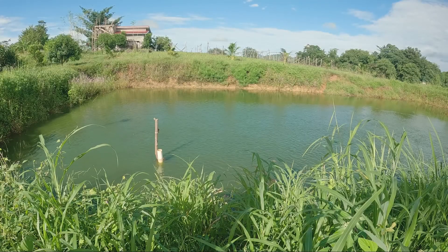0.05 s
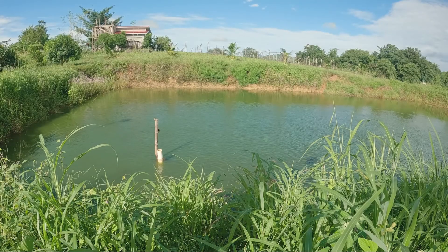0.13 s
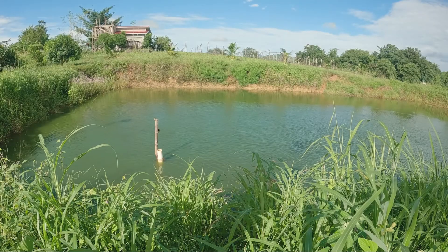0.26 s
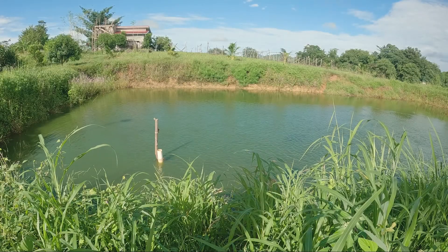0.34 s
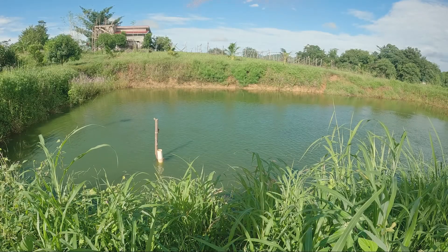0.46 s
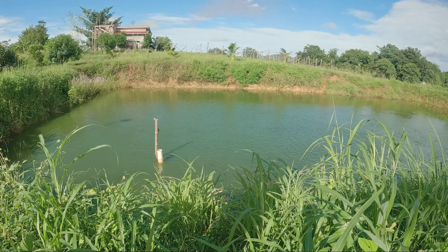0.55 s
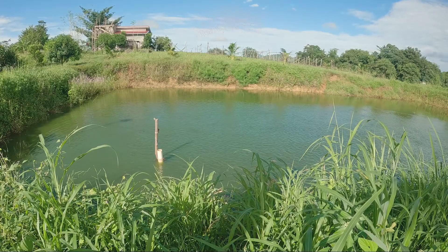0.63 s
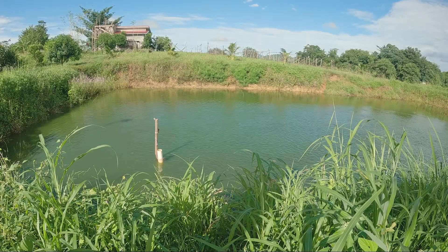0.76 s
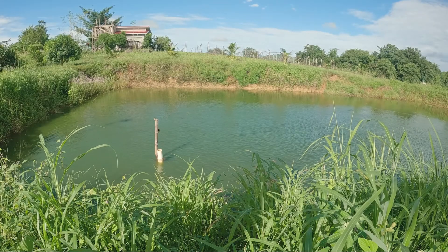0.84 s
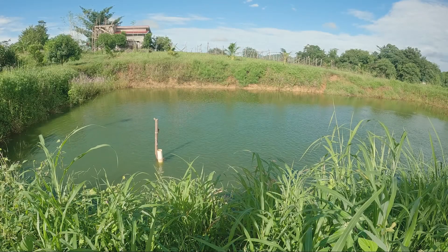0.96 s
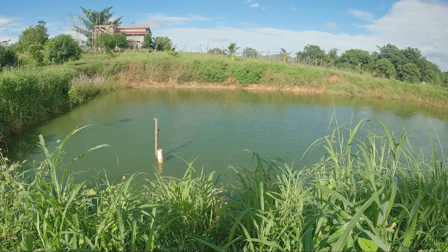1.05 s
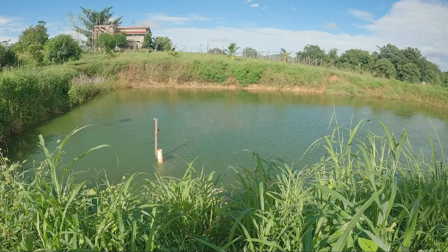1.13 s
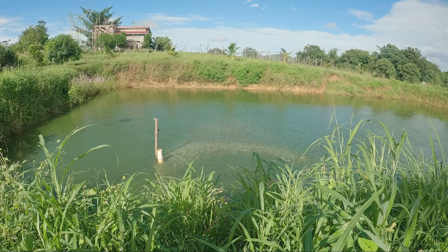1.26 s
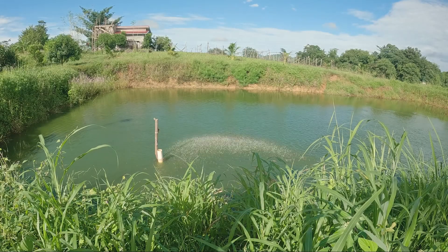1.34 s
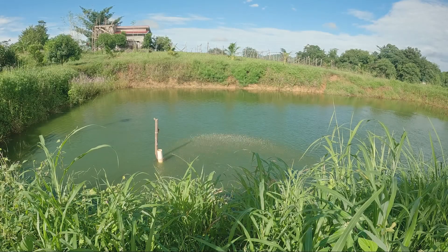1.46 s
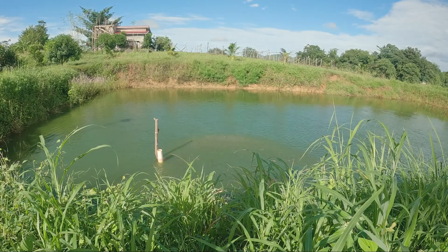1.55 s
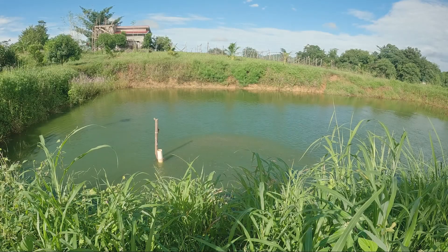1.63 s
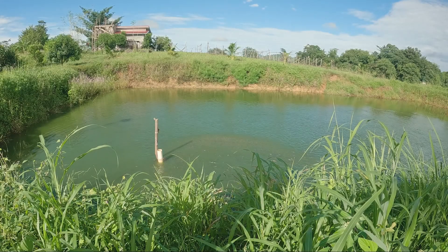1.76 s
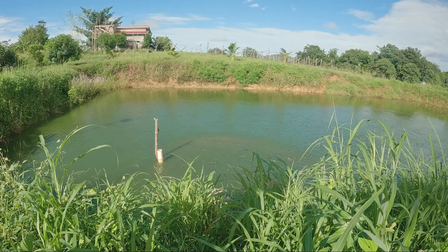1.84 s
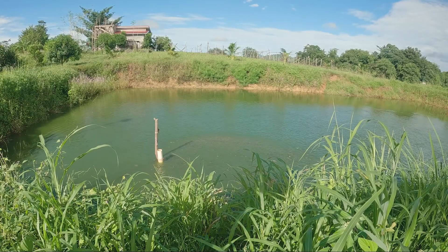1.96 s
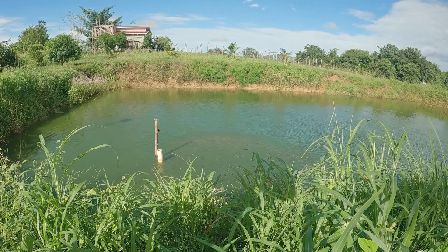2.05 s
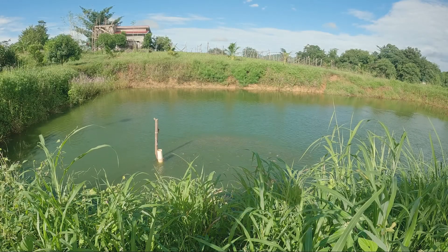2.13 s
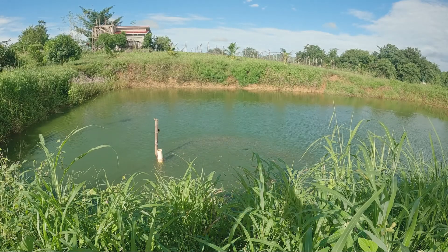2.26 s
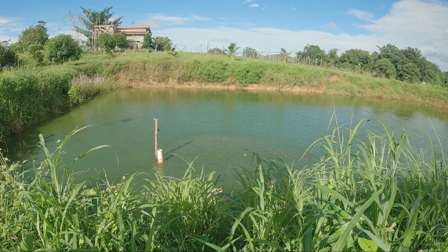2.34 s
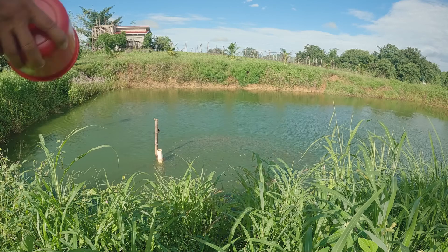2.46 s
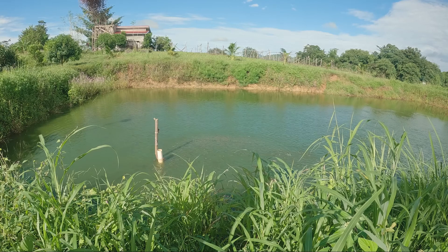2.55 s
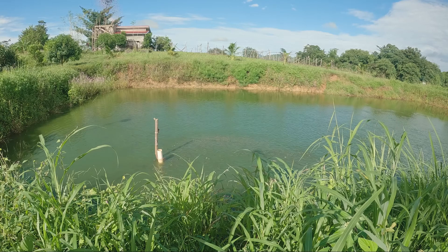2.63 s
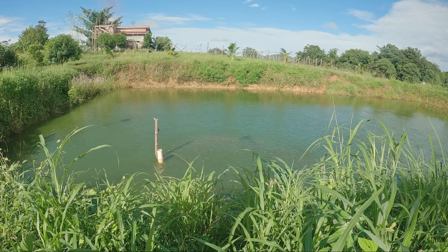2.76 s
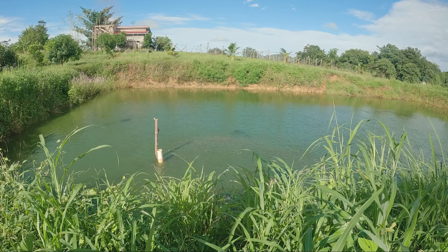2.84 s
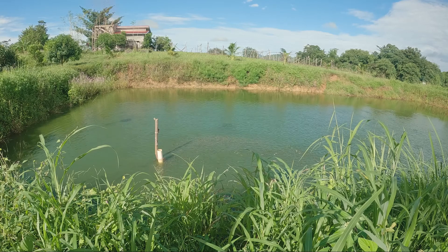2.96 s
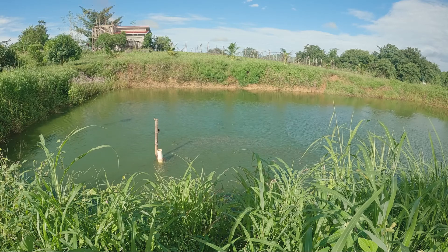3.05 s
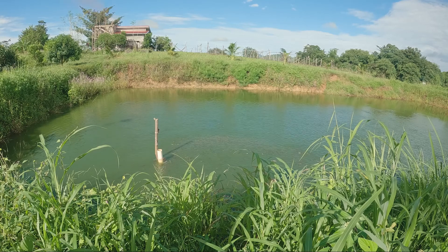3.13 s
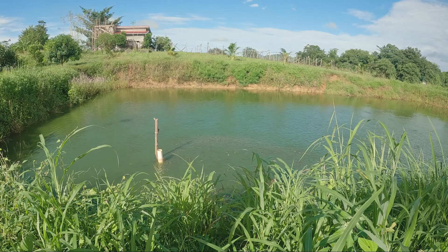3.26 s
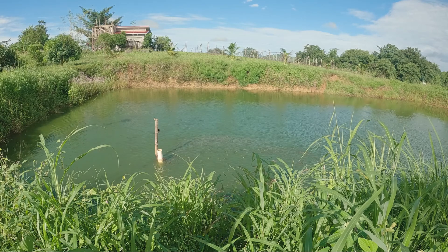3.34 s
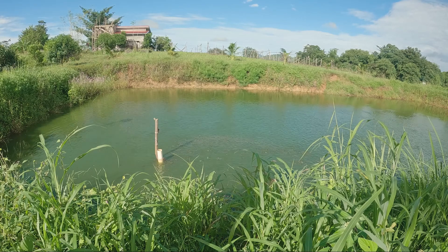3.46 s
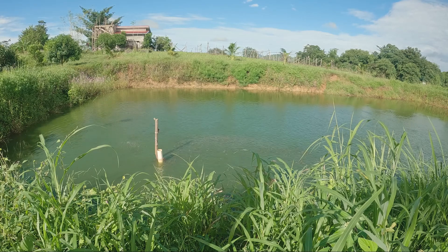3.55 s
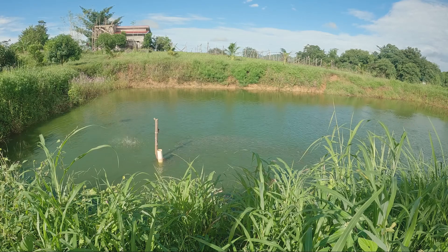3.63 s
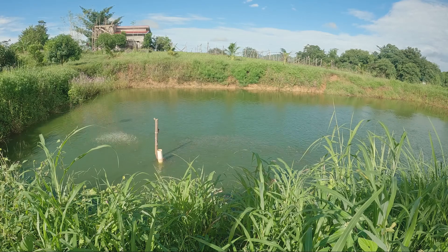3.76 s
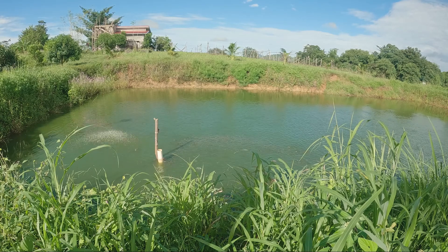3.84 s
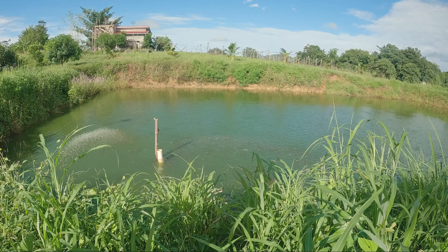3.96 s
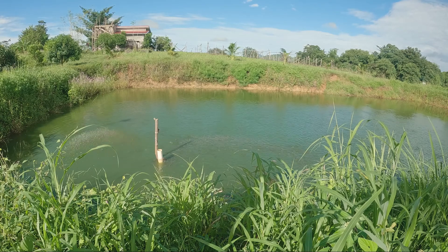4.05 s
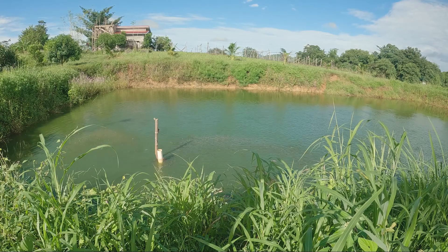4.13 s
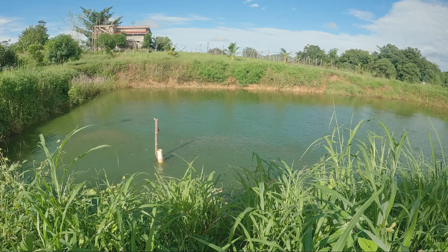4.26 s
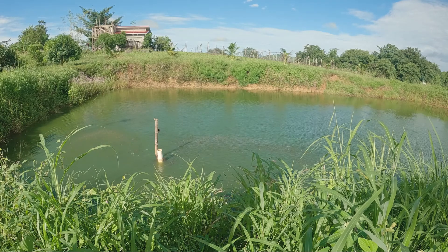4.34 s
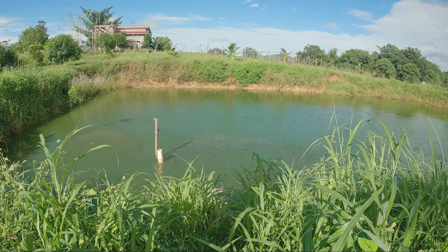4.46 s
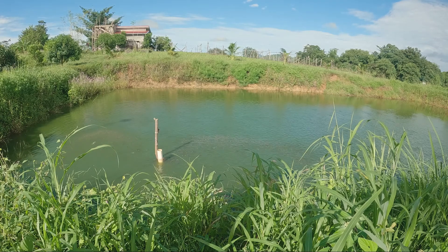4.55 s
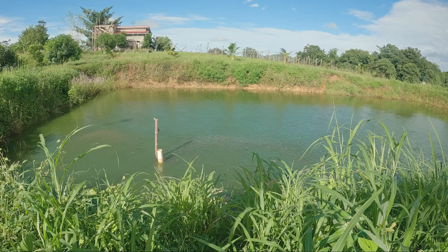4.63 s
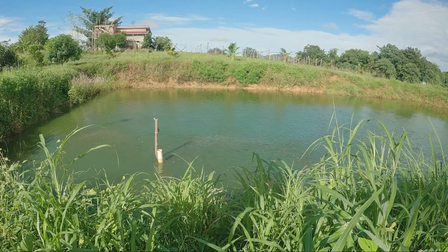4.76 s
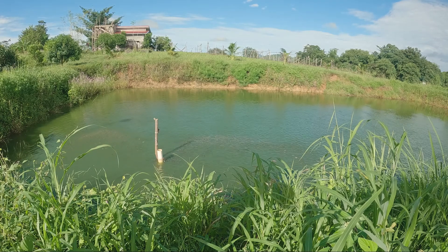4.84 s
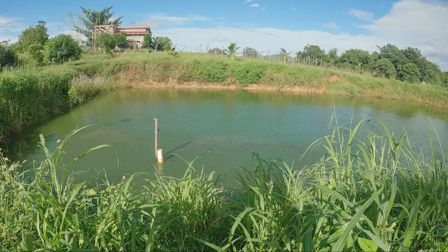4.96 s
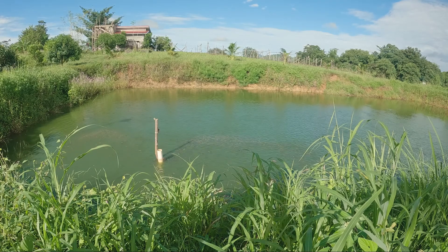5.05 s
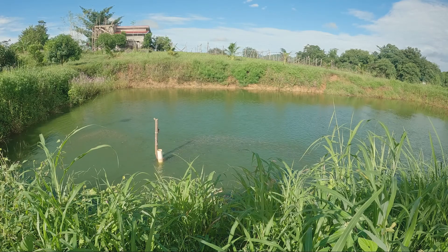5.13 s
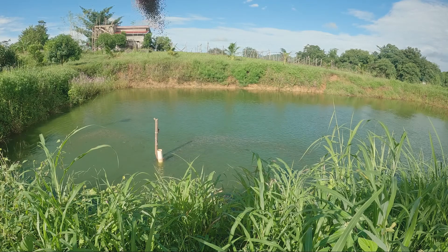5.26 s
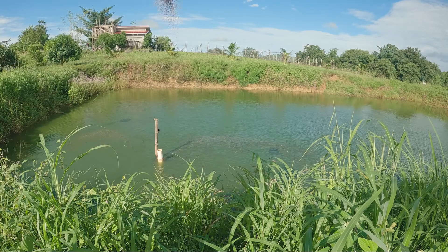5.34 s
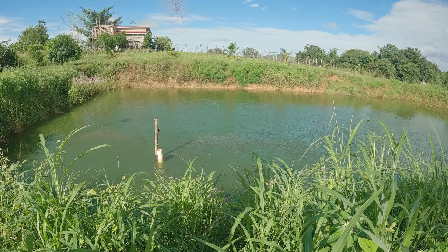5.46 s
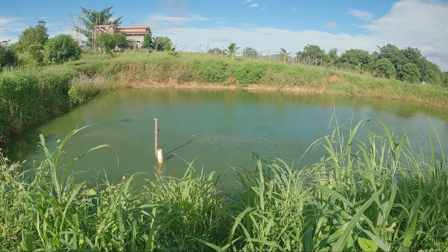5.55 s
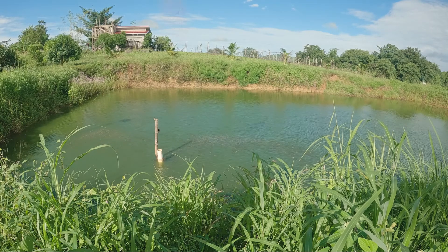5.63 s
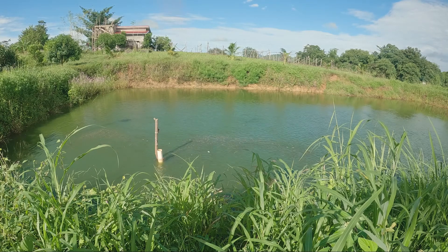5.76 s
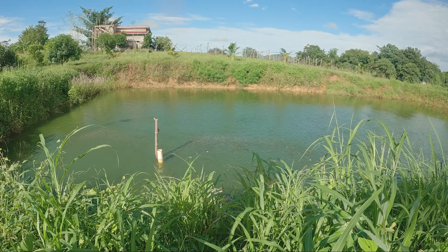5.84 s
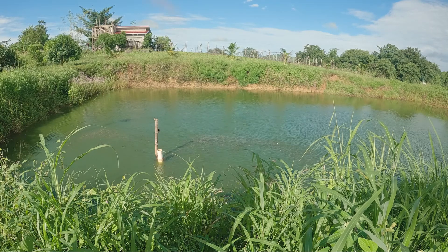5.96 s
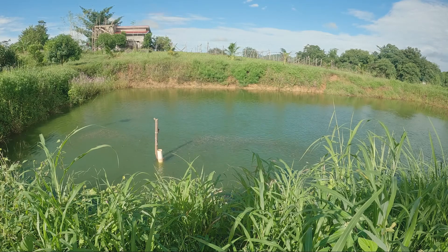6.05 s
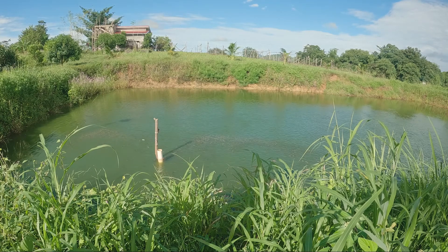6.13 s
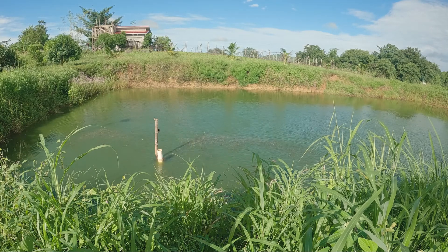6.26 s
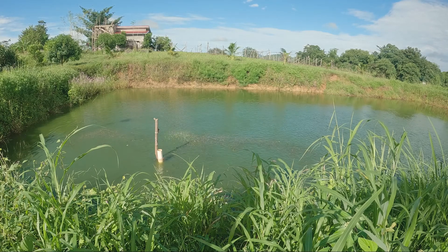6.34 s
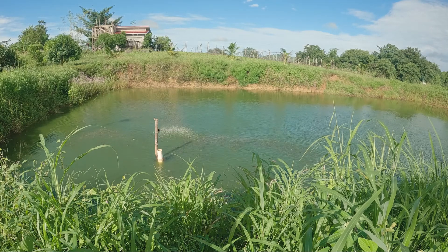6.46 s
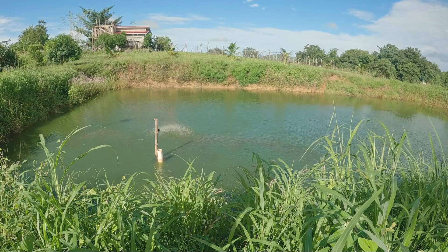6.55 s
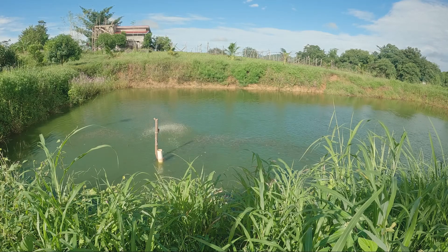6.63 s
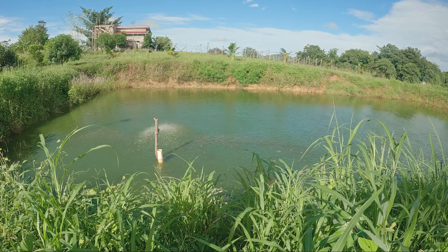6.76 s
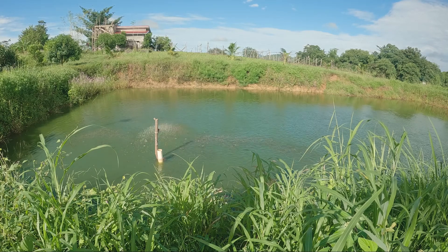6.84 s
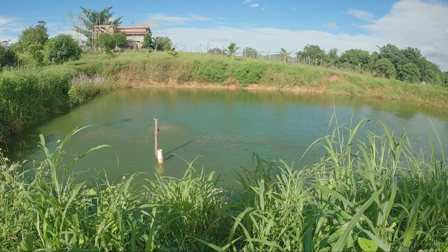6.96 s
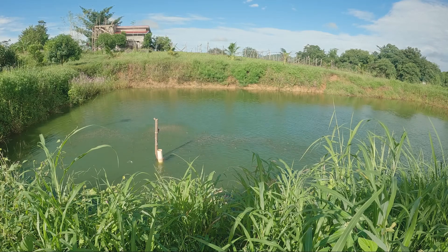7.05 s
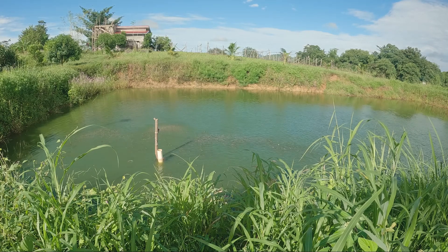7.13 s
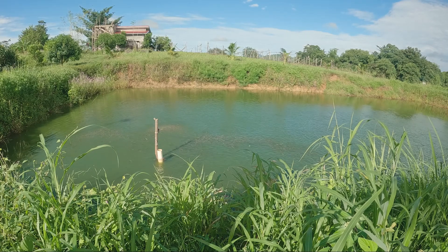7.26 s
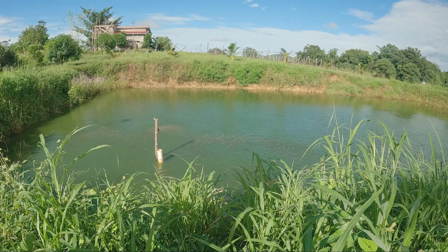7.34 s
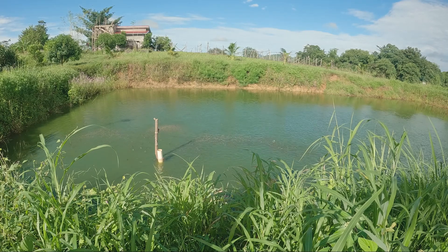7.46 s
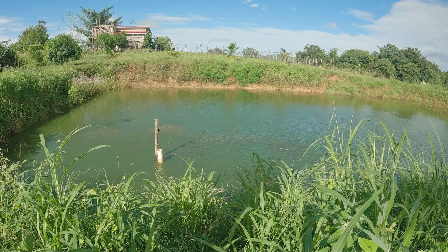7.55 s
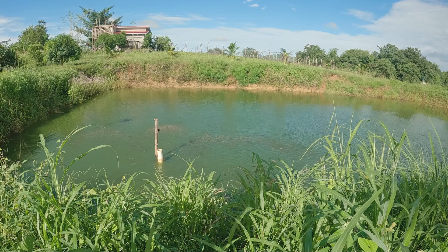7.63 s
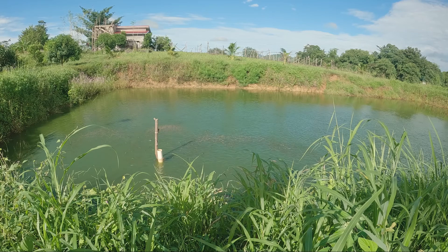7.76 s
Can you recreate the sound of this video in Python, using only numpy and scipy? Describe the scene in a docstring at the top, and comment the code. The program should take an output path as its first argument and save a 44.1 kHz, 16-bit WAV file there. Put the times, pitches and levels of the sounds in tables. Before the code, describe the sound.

Outdoors at a pond, faint crickets chirp throughout over a low, distant rumble and a soft wash of water. A brief shower of pellets splashes at the very start. At about 0.7 seconds a scoop knocks hollowly in a plastic bucket, close on the left, and digs through feed pellets; a light patter on the water follows at 1.4 seconds. At 2.5 seconds pellets are flung past the microphone with a loud, short hiss. The scoop knocks and digs again from 3.2 to 3.7 seconds, and the thrown feed sprinkles the pond around 4 seconds. Pellets rattle softly in the scoop before a second sharp swish at 5.2 seconds. More knocks and scraping come from 6 to 6.7 seconds, overlapping another soft shower on the water. Light rattling and stray ticks continue until nearly 8 seconds. Small plops, drips and bubbles are scattered between the throws.

```python
"""Feeding fish at a pond

A scoop knocks and digs in a plastic bucket just left of the camera's two microphones. Flung past
them, feed pellets rattle and hiss off the scoop's rim, then splash on the water in a shower.
Fish leave drips and bubbles; crickets sing in the grass over a far rumble."""
import sys
import numpy as np
from scipy import signal
from scipy.fft import rfft, irfft, next_fast_len
from scipy.io import wavfile
from scipy.ndimage import uniform_filter1d, map_coordinates

SR = 44100
rng = np.random.default_rng(int(sys.argv[2]) if len(sys.argv) > 2 else 0)


def store_wav(level_fs):
    """Save 16-bit WAV to argv[1]."""
    pcm = np.round(np.clip(np.atleast_2d(level_fs), -1, 1) * 32767)
    wavfile.write(sys.argv[1], SR, pcm.T.astype(np.int16))


N = 343980


def amp(db):
    return 10 ** (np.asarray(db) / 20)


def unit(x):
    return x / np.sqrt(np.mean(x ** 2) + 1e-20)


def along(points, hz):
    """Read (hz, value) points on a log frequency axis."""
    f, v = np.transpose(points)
    return np.interp(np.log(hz + 1), np.log(f + 1), v)


def curves(rows):
    """One value per sample for each column after the time."""
    s, *cols = np.transpose(rows)
    return [np.interp(np.arange(N) / SR, s, c) for c in cols]


def wobble(rate):
    """A smooth random curve, rate knots a second."""
    return map_coordinates(rng.standard_normal(int(N * rate / SR) + 4), [np.arange(N) * rate / SR])


def filtered(x, response):
    """x times a response of frequency."""
    m = next_fast_len(N + SR // 4)
    return irfft(rfft(x, m) * response(np.fft.rfftfreq(m, 1 / SR)), m)[..., :N]


def coloured(x, spectrum):
    return unit(filtered(x, lambda hz: amp(along(spectrum, hz))))


def resonance(hz, centre_hz, width_hz):
    return 1j * hz * width_hz / (centre_hz ** 2 - hz ** 2 + 1j * hz * width_hz)


def sizes_db(chance, spread_db):
    """Many small, few large; the largest are bounded."""
    return np.minimum(-np.log(1 - chance), 3) * spread_db


def patter(count, spread_db, smooth):
    """Tiny contacts of uneven size over a share of smooth noise."""
    when, size, sign = rng.random((count, 3)).T
    hits = np.bincount((when * N).astype(int), np.sign(sign - .5) * amp(sizes_db(size, spread_db)), N)
    return np.sqrt(1 - smooth) * unit(hits) + np.sqrt(smooth) * rng.standard_normal(N)


def blips(s, db, hz, life_s, glide=0, samples=512):
    """Damped sines whose pitch climbs by the share glide during their life."""
    s, db, hz, life_s, glide = (np.reshape(v, (-1, 1)) for v in (s, db, hz, life_s, glide))
    t = np.arange(samples) / SR
    age = t / np.clip(life_s, .0002, .08)
    phase = 2 * np.pi * hz * t * (1 + glide * np.minimum(age, 2) / 2)
    wave = amp(db) * np.sin(phase) * (1 - np.exp(-14 * age)) * np.exp(-.8 * age - age ** 3)
    at = (s * SR).astype(int) + np.arange(samples)
    return np.bincount(at.ravel(), wave.ravel(), N + samples)[:N]


def swells(s, rise, fall, db, hold=0, edge_db=10.5, roundness=1.63):
    """Gain of overlapping swells, each edge_db down one rise or fall time from its top."""
    s, rise, fall, db, hold = (np.reshape(v, (-1, 1)) for v in (s, rise, fall, db, hold))
    t = np.arange(0, N, 64) / SR
    from_top = np.maximum((s - t) / rise, (t - s - hold) / fall).clip(0)
    power = amp(db - edge_db * from_top ** roundness) ** 2
    return np.interp(np.arange(N) / SR, t, np.sqrt(power.sum(axis=0)))


def placed(x, balance, alike):
    """Two microphones: a level difference, and scattered sound that differs between them."""
    t = np.arange(SR // 70) / SR
    scatter = rng.standard_normal(len(t)) * amp(-60 * t / 0.0041)
    scattered = signal.fftconvolve(x, scatter / np.linalg.norm(scatter))[:N]
    angle = lambda hz: np.arccos(along(alike, hz)) / 2
    mid = filtered(x, lambda hz: np.cos(angle(hz)))
    side = filtered(scattered, lambda hz: np.sin(angle(hz)))
    pair = np.array([mid + side, mid - side])
    return filtered(pair, lambda hz: amp(np.outer([.4, -.6], along(balance, hz))))


# Far rumble, spectrum: freq_hz, gain_db
RUMBLE_SPECTRUM = [(11, -38), (18, -10), (70, 5.5), (97, -4.5), (124, -4.5), (173, -15), (203, -10.5),
                   (226, -19), (450, -27.5), (700, -50), (990, -90)]
# Level of the rumble, with a brief dip after the second throw: time_s, level_db
RUMBLE_LEVELS = [(0, -41.5), (2.3, -44), (4.9, -46), (5.3, -42.5), (5.5, -49), (6.6, -44), (7.8, -42)]
def far_rumble():
    """Low wavering noise from a distance, nearly alike at both microphones."""
    level_db, = curves(RUMBLE_LEVELS)
    rumble = coloured(rng.standard_normal(N), RUMBLE_SPECTRUM) * amp(level_db + 1.8 * wobble(5))
    return placed(rumble, balance=[(60, -0.26), (400, -0.83)], alike=[(60, 1), (300, 0.87)])


# Countless insects far off in the grass: freq_hz, gain_db
MEADOW_SPECTRUM = [(5000, -29), (6500, -4), (8500, 2), (10300, -4), (11300, -20), (14000, -19),
                   (15700, -40)]
# Far singers, to the left: time_s, chorus_db, trill_db, buzz_db
FAR_INSECTS = [(0, -54, -70, -71), (.6, -56.5, -77, -83), (1.5, -55, -72, -69), (3.1, -56.5, -70, -78),
               (3.9, -53.5, -62.5, -67), (4.7, -55, -66, -68), (5.8, -57, -68, -74), (6.5, -54, -70, -66.5),
               (7.8, -54, -68, -67)]
# Pace of the trill: time_s, bursts_per_s
TRILL_PACE = [(0, 9.5), (3, 9.6), (3.6, 10.3), (5.5, 9.65), (6, 9.0), (7.8, 9.0)]
def far_insects():
    """A shimmering chorus, a trill in bursts and an unbroken buzz over the meadow's hiss."""
    chorus_db, trill_db, buzz_db = curves(FAR_INSECTS)
    t, noise = np.arange(N) / SR, rng.standard_normal

    def band(x, hz, width_hz):
        return unit(filtered(x, lambda f: resonance(f, hz, width_hz) ** 2))

    def strokes(per_s):
        pulses = np.diff(np.floor(per_s * t + .25 * wobble(6)), prepend=0)
        return unit(pulses * amp(0.57 * wobble(60))) + .5 * noise(N)

    chorus = band(noise((2, N)) + 0.63 * noise(N), 7530, 580) * amp(chorus_db + 2 * wobble(50))
    bursts = (np.cumsum(curves(TRILL_PACE)[0]) / SR - .04) % 1 < .68
    trill = amp(trill_db) * band(strokes(121) * uniform_filter1d(1. * bursts, size=500), 8760, 550)
    buzz = amp(buzz_db) * band(strokes(105), 10070, 450)
    meadow = amp(-65) * coloured(noise((2, N)) + 1.2 * noise(N), MEADOW_SPECTRUM)
    return meadow + chorus * amp([[2], [-2.5]]) + (trill + buzz) * amp([[1.5], [-2]])


# One cricket nearby on the left, loudest note of each phrase: time_s
PHRASE_TIMES = [0.2174, 0.459, 0.688, 0.9892, 1.2695, 1.5589, 1.828, 2.09, 2.331, 2.8604, 3.116, 3.3717,
                3.6379, 3.9215, 4.1619, 4.4104, 4.685, 4.9606, 5.2026, 5.5717, 5.8267, 6.0546, 6.337,
                6.5734, 6.8294, 7.21, 7.514, 7.7754]
# The notes of a phrase: offset_s, gain_db, pitch_hz
PHRASE_NOTES = [(-.055, -1, 7200), (-.041, 2, 7080), (-.0145, 1, 6950), (0, 6.5, 7220), (.093, 0, 7100)]
def near_cricket():
    """A phrase of five short high notes, repeated a little louder or softer."""
    s = np.array(PHRASE_TIMES)
    db = rng.normal(-46.5, 1, len(s))
    song = sum(blips(s + offset, db + gain_db, hz, life_s=0.0055) for offset, gain_db, hz in PHRASE_NOTES)
    return song * amp([[2], [-2.5]])


# Level of the water's wash and crackle; it jumps at 0.7 s and dips after the second throw:
# time_s, wash_db, crackle_db
WATER_LEVELS = [(0, -57.5, -84), (.68, -71, -84), (.71, -51, -68), (1.4, -58, -57), (2.6, -50, -57),
                (3.3, -55, -66), (4.6, -56, -56), (5.3, -50, -59), (5.42, -56, -67), (6.2, -51.5, -62),
                (7.0, -50, -61), (7.8, -55, -62)]
# Wash of the water: freq_hz, gain_db
WASH_SPECTRUM = [(180, -16), (300, -4), (450, -6), (800, -7.5), (1100, -1.5), (2000, -5.5), (3200, -9),
                 (6000, -11.5), (8300, -20), (11500, -21.5), (14000, -27), (15500, -60)]
# Bubbles that close as they rise: start_s, level_db, first_hz, last_hz, life_s
RISING_BUBBLES = [(.36, -56, 990, 1400, .012), (4.955, -52, 770, 1090, .028), (.425, -57, 520, 950, 0.035),
                  (2.286, -44, 790, 1090, 0.049), (2.645, -47, 784, 1200, 0.026),
                  (2.691, -45, 1040, 1430, 0.035), (2.74, -50, 1300, 2330, .018),
                  (3.025, -48, 1030, 1510, 0.021), (3.165, -47, 1200, 1600, 0.021),
                  (3.208, -48, 1090, 3020, .02), (5.11, -47, 590, 1310, 0.072),
                  (5.35, -50, 970, 1860, 0.033), (5.566, -46.5, 843, 1320, 0.05),
                  (5.87, -48, 496, 830, 0.039), (6.155, -48, 646, 1090, 0.022),
                  (6.89, -40.5, 435, 1140, .07), (7.556, -39, 1059, 1610, 0.016),
                  (7.725, -55, 880, 1240, 0.033)]
def pond():
    """Rising bubbles, faint random plops and a crackle of bursting film on a wash."""
    wash_db, crackle_db = curves(WATER_LEVELS)
    s, db, first_hz, last_hz, life_s = np.transpose(RISING_BUBBLES)
    rising = blips(s, db, first_hz, life_s, glide=last_hz / first_hz - 1, samples=4500)
    when, pitch, size, ring = rng.random((1600, 4)).T
    s, hz = when * (N - 1) / SR, 850 * amp(9 * pitch)
    plops = blips(s, sizes_db(size, 2.6), hz, (4 + 14 * ring ** 2) / hz, 0.28 * ring ** 2, samples=1024)
    when, pitch, size, ring = rng.random((900, 4)).T
    s, hz = when * (N - 1) / SR, 1800 * amp(11 * pitch)
    crackle = blips(s, sizes_db(size, 1.8), hz, (2 + 3 * ring) / hz, samples=128)
    wash = coloured(rng.standard_normal(N), WASH_SPECTRUM) * amp(0.96 * wobble(13))
    return amp(wash_db) * (0.64 * wash + 0.54 * unit(plops)) + amp(crackle_db) * unit(crackle) + rising


# Drops and fish mouths on the water, centre: start_s, level_db, pitch_hz
WATER_PLOPS = [(0.494, -42.5, 1610), (0.515, -49, 730), (1.278, -28.5, 2200), (1.973, -43, 1360),
               (2.023, -40.5, 2240), (2.12, -40, 1690), (2.339, -42, 690), (2.719, -44, 745),
               (2.745, -34, 1900), (2.91, -46, 1320), (2.922, -39.5, 2340), (2.941, -41, 1470),
               (3.057, -46, 1460), (3.184, -40.5, 1400), (4.653, -33, 1860), (4.682, -35.5, 1940),
               (4.721, -35.5, 1640), (4.738, -33, 2660), (4.761, -33, 1880), (5.092, -42, 1240),
               (5.134, -39, 1860), (5.404, -43, 1720), (5.609, -42.5, 1080), (5.84, -39, 2520),
               (5.854, -36, 1540), (7.115, -40, 1210), (7.25, -33.5, 2140), (7.475, -38.5, 1340),
               (7.521, -35, 1050)]
# Stray pellets and drops, either side: start_s, level_db, pitch_hz, left_over_right_db
STRAY_TICKS = [(0.5172, -33, 4600, -1.5), (1.805, -32, 4110, 7.5), (1.8453, -34.5, 2610, 5),
               (2.0972, -24, 4100, -1), (2.1387, -26.5, 3430, 2), (2.9598, -33.5, 3500, -1.0),
               (4.605, -29.5, 3400, 0), (4.9856, -23.5, 4100, 1.0), (5.008, -20, 6060, 2),
               (5.7309, -38, 4790, 0.0), (5.7549, -34, 2700, -3), (6.033, -37, 4710, 2.5),
               (6.8663, -22, 3120, 4), (7.0577, -21.5, 4900, -1), (7.213, -26.5, 4210, 4.5),
               (7.3484, -29, 4710, 5), (7.5597, -31, 5190, 4.5), (7.645, -40, 4450, 3.5),
               (7.6825, -35, 4400, 4), (7.79, -42, 4400, 19)]
# Pellets snapping on plastic, to the left: start_s, level_db, left_over_right_db
PLASTIC_SNAPS = [(1.165, -40, 6.0), (2.3955, -44, 17), (2.4229, -39, 20), (2.459, -36, 18), (2.82, -44, 1),
                 (4.2607, -38, 11), (4.3, -38, 12), (4.378, -39, 9.5), (5.1552, -42, 18),
                 (6.7625, -37, 4.5), (7.1375, -32, 7.0), (7.4535, -46, 24), (7.4955, -41, 15.5),
                 (7.5802, -44, 2.5)]
def drips_and_strays():
    """Single plops, ticks and bright snaps; the pond's banks smear them a little."""
    def panned(s, db, pan_db, hz, life_s):
        return np.array([blips(s, db + side * pan_db / 2, hz, life_s, samples=128) for side in (1, -1)])

    s, db, hz = np.transpose(WATER_PLOPS)
    plops = blips(s, db, hz, 7 / hz, glide=0.034, samples=1024)
    s, db, hz, pan_db = np.transpose(STRAY_TICKS)
    ticks = panned(s, db, pan_db, hz, 2 / hz)
    s, db, pan_db = np.transpose(PLASTIC_SNAPS)
    snaps = panned(s, db, pan_db, hz=11500, life_s=0.00042)
    dull_plastic = panned(s, db + 3.5, pan_db, hz=3050, life_s=2 / 3050)
    direct = plops + ticks + snaps + dull_plastic
    t = np.arange(SR // 50) / SR
    banks = rng.standard_normal((2, len(t))) * amp(-60 * t / 0.056)
    banks /= np.linalg.norm(banks[0])
    return direct + amp(0.5) * signal.fftconvolve(direct, banks, axes=1)[:, :N]


# Pellets landing out on the pond: top_s, rise_s, hold_s, fall_s, level_db, tilt_db, drift_db_per_s
LANDINGS = [(0.107, 0.044, 0.067, 0.018, -29, 2, 46), (1.386, 0.12, 0.048, 0.088, -34, 0, -18),
            (4.005, 0.25, 0.043, 0.039, -36.5, 0, 1), (6.595, 0.22, 0.29, 0.047, -39, -2, 6)]
# Their spray: freq_hz, gain_db
SPRAY_SPECTRUM = [(180, -30), (300, -14.5), (550, -6), (950, -0.5), (1600, -2), (3500, -3.5), (5500, -6),
                  (8000, -18), (10500, -19.5), (12500, -20), (14000, -32), (15600, -42)]
def showers():
    """Hundreds of pellets break the surface: short bubbles inside a spray of clicks."""
    s, rise, hold, fall, db, tilt_db, drift = np.transpose(LANDINGS)
    t = np.arange(N) / SR
    nearest = np.argmin(np.abs(t - s[:, None]), axis=0)
    bright_db = np.clip(tilt_db[nearest] + drift[nearest] * (t - s[nearest]), -9, 9)
    when, pitch, size = rng.random((10000, 3)).T
    hz = 700 * amp(17 * pitch)
    fizz = unit(blips(when * (N - 1) / SR, sizes_db(size, 12), hz, 3 / hz, glide=0.17, samples=256))
    spray = coloured(patter(count=40000, spread_db=2, smooth=0.2), SPRAY_SPECTRUM) + 0.29 * fizz
    low = filtered(spray, lambda hz: 1 / (1 + (hz / 2500) ** 2))
    return swells(s, rise, fall, db, hold) * (amp(-bright_db) * low + amp(bright_db) * (spray - low))


# Digging deep in the bucket: top_s, rise_s, hold_s, fall_s, scrape_db, boom_db
SCOOP_DIGS = [(0.752, 0.014, 0.021, .03, -36.5, -29), (0.907, 0.095, 0.032, 0.038, -42, -36),
              (0.99, 0.053, 0.1, 0.13, -43.5, -35), (3.349, 0.0087, 0.062, 0.065, -40, -35),
              (3.573, 0.062, 0.11, 0.063, -38, -31.5), (6.227, 0.0075, 0.091, 0.042, -41.5, -31),
              (6.453, 0.067, .05, 0.052, -38, -27), (6.615, 0.079, 0.032, .09, -40.5, -39)]
# Pellets shifting in the lifted scoop: top_s, rise_s, fall_s, hollow_db, scrape_db, rattle_db
SCOOP_SHAKES = [(1.44, 0.13, 0.059, -52.5, -48, -48.5), (1.71, 0.29, 0.099, -48.5, -55, -46.5),
                (2.02, 0.15, 0.11, -55, -60, -54.5), (2.46, 0.12, 0.08, -47.5, -51, -52.5),
                (3.87, 0.17, .06, -50.5, -47.5, -52), (4.12, 0.057, .05, -58, -46, -47.5),
                (4.25, 0.14, 0.097, -49, -51.5, -43.5), (4.47, 0.12, 0.088, -44, -45.5, -40),
                (4.86, 0.13, 0.083, -61.5, -69, -39), (5.21, 0.11, 0.058, -51.5, -54, -54),
                (6.76, .08, 0.068, -54.5, -47, -45), (7.0, 0.23, 0.092, -57.5, -49, -47),
                (7.36, 0.39, 0.16, -54, -52, -46.5)]
# Pellets scraping: freq_hz, gain_db
SCRAPE_SPECTRUM = [(300, -29), (700, 2), (1100, 6), (1500, 8), (2200, -2.5), (3000, -7.5), (4000, -36)]
# Pellets rattling: freq_hz, gain_db
RATTLE_SPECTRUM = [(1800, -20), (2800, -9), (3800, -4.5), (4700, -2), (5700, -3.5), (7000, -11),
                   (9500, -25.5), (12200, -19), (14000, -34), (15800, -45)]
def scoop():
    """Pellets grind past the scoop; they drive the bucket's air, the scoop's hollow and the walls."""
    s, rise, hold, fall, *levels = np.transpose(SCOOP_DIGS)
    dig, dig_boom = (swells(s, rise, fall, db, hold) for db in levels)
    s, rise, fall, *levels = np.transpose(SCOOP_SHAKES)
    shake_hollow, shake_scrape, shake_rattle = (swells(s, rise, fall, db) for db in levels)
    coarse = patter(count=1500, spread_db=2.5, smooth=0.45)
    boom = unit(filtered(coarse, lambda hz: resonance(hz, 249, 43) * resonance(hz, 216, 290)))
    fine = patter(count=8000, spread_db=5, smooth=0.91)
    hollow = unit(filtered(fine, lambda hz: resonance(hz, 549, 230) ** 2))
    grind = patter(count=9000, spread_db=3.5, smooth=0.54) * amp(1.04 * wobble(60))
    return (np.hypot(dig_boom, amp(-10) * shake_hollow) * boom
            + np.hypot(amp(-8.5) * dig, shake_hollow) * hollow
            + np.hypot(dig, shake_scrape) * coloured(grind, SCRAPE_SPECTRUM)
            + np.hypot(amp(-5) * dig, shake_rattle) * coloured(grind, RATTLE_SPECTRUM))


# Scoop striking the bucket, relative levels: start_s, crack_db, boom_db, wall_db
SCOOP_KNOCKS = [(0.691, -24, -40, -32), (0.6996, -6, -18, -4.5), (0.7403, -12, -35, -34),
                (0.7532, -20, -14, -18), (3.245, -1, -43, -15), (3.249, -31, -30, -12),
                (3.3104, -4.5, -8, -6.5), (3.343, -16, -29, -43), (3.6818, -38, -30, -13.5),
                (5.9837, -8.5, -58, -26), (6.101, -37, -48, -46), (6.123, -6.5, -9.5, -6),
                (6.2248, -10.5, -33, -32), (6.6179, -15, -27.5, -9)]
# The bucket's modes, air first, then walls: pitch_hz, gain_db, t60_s
BUCKET_MODES = [(253.6, 0, 0.07), (575, -18, 0.02), (930, -33, 0.03), (1244, -19.5, 0.019),
                (1704, -39.5, 0.078), (2350, -33.5, 0.026)]
def knocks():
    """Each knock crunches pellets, sounds the bucket's air mode and shakes its walls."""
    out, t = np.zeros(N + SR), np.arange(SR // 6) / SR
    attack = 1 - np.exp(-t / 0.0018)
    for s, crack_db, boom_db, wall_db in SCOOP_KNOCKS:
        hit = amp(crack_db - 16.5 - 60 * t / 0.033) * rng.standard_normal(len(t))
        for k, (hz, db, t60) in enumerate(BUCKET_MODES):
            if k == 0:
                level_db, blur = boom_db + 0.5, 0
            else:  # soft plastic blurs the walls' pitch
                level_db = wall_db + db + 11.5 + rng.normal(0, 2.6)
                blur = 0.099 * np.cumsum(rng.standard_normal(len(t)))
            hit += amp(level_db - 60 * t / t60) * np.sin(2 * np.pi * hz * t + blur) * attack
        out[round(s * SR):][:len(t)] += hit
    return filtered(out[:N], lambda hz: 1 / (1 + 1j * hz / 5000) / (1 + (hz / 12500) ** 4))


# The bucket, just left of the microphones: freq_hz, left_over_right_db
BUCKET_BALANCE = [(60, 2), (110, -3), (200, 0.5), (380, 3), (700, 9.5), (1290, 10), (2380, 17), (4400, 9.5),
                  (8120, -3.5), (15000, 7)]
# How alike it arrives at the two: freq_hz, likeness
BUCKET_LIKENESS = [(300, 1), (1400, 0.93), (3000, 0.23), (5000, 0.98), (8000, 0.053), (12000, 0.027)]
def bucket():
    """Scooping and knocks reach the microphones from the same spot."""
    return placed(scoop() + knocks(), BUCKET_BALANCE, BUCKET_LIKENESS)


# Air pushed by the arm, right at the microphones: peak_s, level_db, pitch_hz
AIR_PUSHES = [(2.522, -19, 11.6), (5.249, -13, 16)]
def arm_swings():
    """Each swing shoves one slow pulse of pressure at the microphones."""
    t = np.arange(N) / SR
    return sum(amp(db) * np.cos(2 * np.pi * hz * (t - s)) * np.exp(-(1.9 * hz * (t - s)) ** 2)
               for s, db, hz in AIR_PUSHES)


# Pellets leaving the scoop, passing close on the left: time_s, hiss_db
PELLET_THROWS = [(2.532, -20.5), (5.238, -19)]
# Course of every throw: offset_s, gain_db, body_over_hiss_db
THROW_COURSE = [(-.045, -36, 6), (-.016, -30.5, 8), (0, -12, -0.5), (.023, 0.5, -11), (.065, -0.4, -15),
                (.106, -7.5, -16.5), (.125, -35.5, -1)]
# Hiss off the rim: freq_hz, gain_db
RIM_SPECTRUM = [(1470, -56), (2500, -15.5), (2980, -14), (3440, -17), (5080, 0.5), (5970, 0.5), (7620, -7),
                (8230, -15), (12300, -21.5), (14500, -39), (15500, -81)]
# Lower body of a full scoop's rush: freq_hz, gain_db
BODY_SPECTRUM = [(250, -22), (500, 2.5), (900, -3.5), (1600, 1), (2500, -3), (3500, -2.5), (5000, -30)]
def throws():
    """Pellets rush over the scoop's rim in clumps; a full scoop sounds low, an emptying one higher."""
    t = np.arange(N) / SR
    offset, course_db, over_db = np.transpose(THROW_COURSE)
    gain = sum(amp(db + np.interp(t - s, offset, course_db, -np.inf, -np.inf)) for s, db in PELLET_THROWS)
    body_db = sum(np.interp(t - s, offset, over_db, 0, 0) for s, _ in PELLET_THROWS)
    rush = patter(count=60000, spread_db=6, smooth=0.78) * amp(0.57 * wobble(250))
    fullness = np.clip((body_db + 21) / 16, 0, 1)
    emptying = unit(filtered(rush, lambda hz: resonance(hz, 2100, 2050) ** 2))
    body = fullness * coloured(rush, BODY_SPECTRUM) + (1 - fullness) * emptying
    pellets = gain * (coloured(rush, RIM_SPECTRUM) + amp(body_db) * body)
    return placed(pellets, balance=[(300, 2.8), (3000, 3.7), (12000, 5.6)],
                  alike=[(1000, 0.95), (6000, 0.88), (13000, 0.55)])


def scene():
    """Grass, water and feeding as heard from the bank."""
    background = far_rumble() + far_insects() + near_cricket()
    surface = placed(pond() + showers(), balance=[(500, -4), (3000, 2.3), (10000, 4)],
                     alike=[(500, 1), (3000, 0.72), (10000, 0.63)])
    return background + surface + drips_and_strays() + bucket() + arm_swings() + throws()


def record(dry, fade_hz=14800, limit_hz=15750):
    """The microphones fade in the top octave and the camera keeps nothing above its band limit."""
    return filtered(dry, lambda hz: (hz < limit_hz) / np.sqrt(1 + (hz / fade_hz) ** 24))


dry = scene()
out = record(dry)
store_wav(out)
```